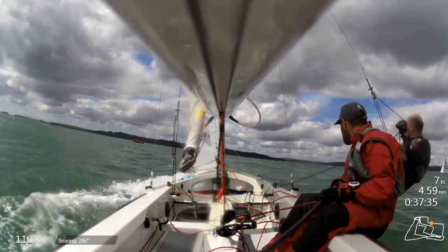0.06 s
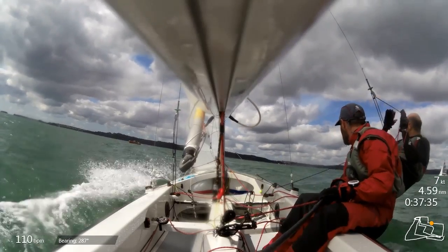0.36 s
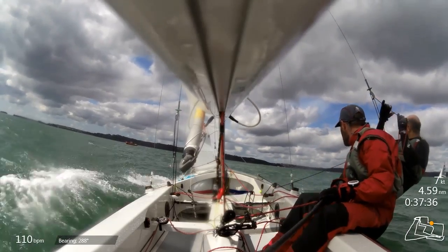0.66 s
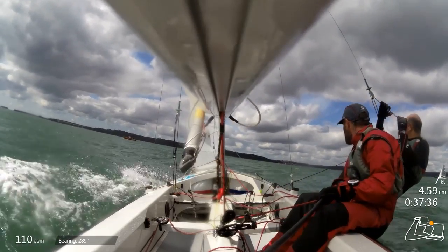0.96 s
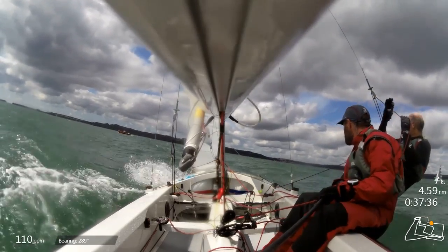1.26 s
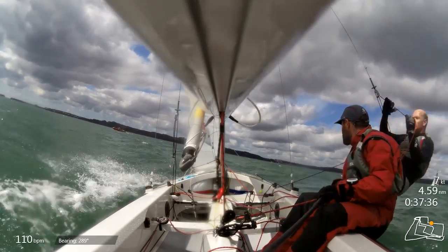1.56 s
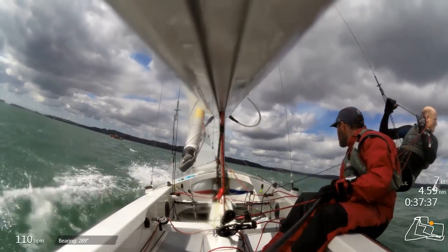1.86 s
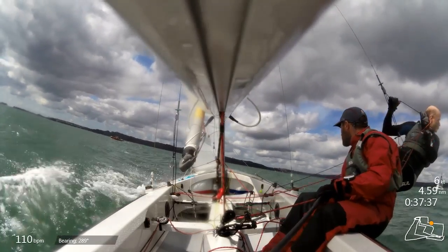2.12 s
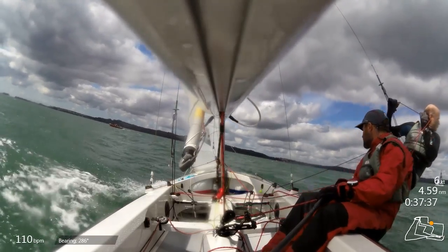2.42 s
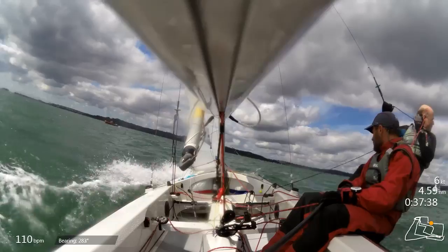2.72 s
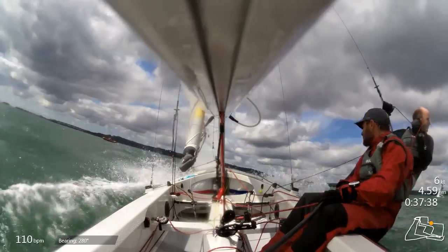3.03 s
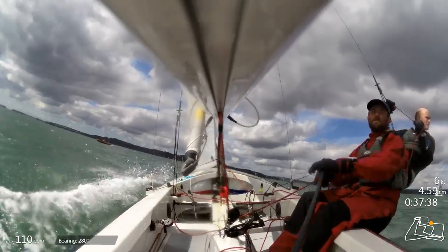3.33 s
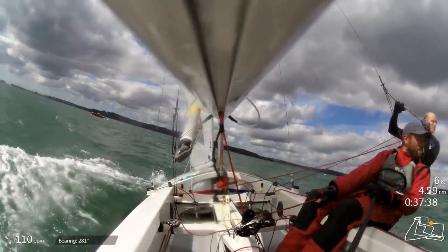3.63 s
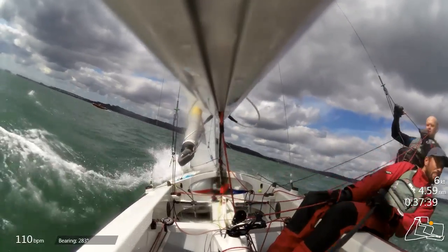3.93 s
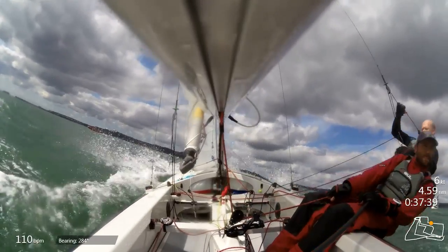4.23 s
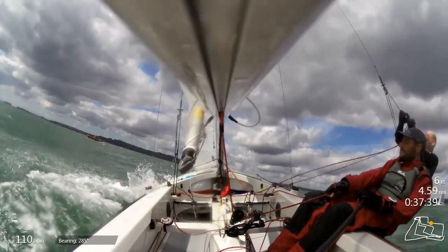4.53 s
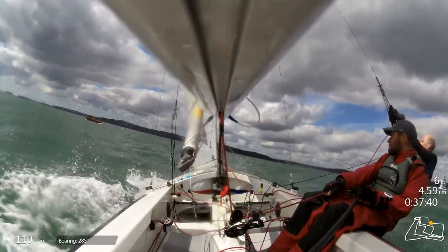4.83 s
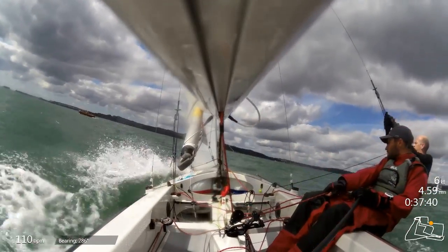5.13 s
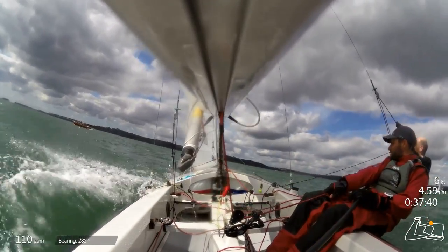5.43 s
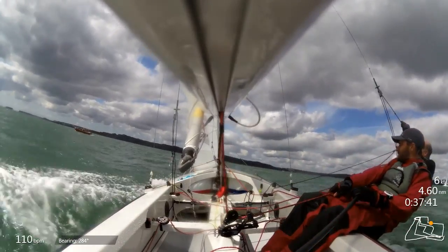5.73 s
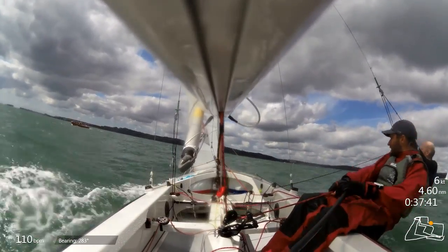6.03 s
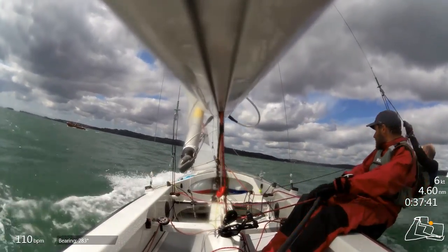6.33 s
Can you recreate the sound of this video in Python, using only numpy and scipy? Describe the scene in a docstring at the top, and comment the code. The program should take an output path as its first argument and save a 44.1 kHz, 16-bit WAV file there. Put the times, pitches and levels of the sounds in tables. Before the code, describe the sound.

A hollow, muffled wind roar with small irregular thumps fills a microphone sealed in a case aboard a speeding dinghy. Faint water hiss and a few light drips sit underneath. Midway, a stronger gust briefly distorts the sound and brings a gurgling slap of water, followed by a cluster of sharp drop taps. The buffeting continues, and a brief patter of spray lands shortly before the end.

```python
"""A dinghy in choppy water

Heard from inside a waterproof camera case at the stern of a speeding dinghy. Swirls of wind (eddies)
make the case boom near 330 Hz and overload the microphone in the hardest gusts. The bow wave hisses
dully through the case wall while spray and single drops patter on it. Midway, a hard gust drives
a wave against the case."""
import sys
import numpy as np
from scipy import signal
from scipy.fft import rfft, irfft, next_fast_len
from scipy.io import wavfile
from scipy.ndimage import uniform_filter1d

SR = 44100
rng = np.random.default_rng(int(sys.argv[2]) if len(sys.argv) > 2 else 0)


def pcm_store(signal):
    """Save signal as 16-bit PCM."""
    levels = np.round(np.clip(np.atleast_2d(signal), -1, 1) * 32767)
    wavfile.write(sys.argv[1], SR, levels.astype(np.int16).T)


N = 285327
TIME = np.arange(N) / SR
GUST_ONSET_DB = -16   # wind stronger than this counts as the hard gust
CLUMPS_HZ = 40   # how fast splashing water rises and falls as it lands in clumps

# How strong the wind is. Each row: time in seconds, relative boom level in dB.
WIND_STRENGTH = [(0, -18.5), (.72, -18), (.92, -20), (1.08, -17.5), (2.4, -19), (3.0, -16.5), (3.37, -19),
                 (3.44, -13), (3.66, -13), (3.72, -26), (3.78, -13), (3.89, -22), (3.97, -17.5),
                 (4.2, -20.5), (4.7, -18.5), (5.35, -18), (5.95, -19.5), (6.47, -18)]
# The tone of the wind inside the case. Each row: frequency in Hz, relative level in dB.
BOOM_TONE = [(150, -25.5), (208, -9.5), (245, -7.5), (295, -3), (340, 0.5), (395, -2.5), (445, -10),
             (480, -8), (545, -19.5), (700, -32), (1000, -53)]
# The hollow notes of the case. Each row: pitch in Hz, width in Hz, relative level in dB.
HOLLOW_NOTES = [(300, 25, -1), (322, 12, -5), (388.9, 28, -11.5)]
# How much those notes colour the boom. Each row: time in seconds, relative level in dB.
HOLLOW_LEVEL = [(0, -5), (1.5, -16), (3.2, -10), (3.7, -1), (5.2, -3.5), (5.9, -9), (6.47, -2)]
# The tone of small eddies at the case's edges. Each row: frequency in Hz, relative level in dB.
SMALL_EDDY_TONE = [(350, -18), (600, 5.5), (750, 1), (1000, -15.5), (1400, -21), (2200, -24), (4000, -38.5),
                   (8000, -61.5)]
# Their loudness in ordinary wind. Each row: time in seconds, relative level in dB.
SMALL_EDDY_LEVEL = [(0.0, -43), (0.79, -39.5), (0.88, -41.5), (1.62, -38.5), (1.96, -43.5), (2.72, -39),
                    (2.88, -34), (3.35, -38.5), (3.48, -31.5), (3.58, -47), (3.86, -49), (3.98, -35.5),
                    (4.14, -42), (4.59, -41), (4.96, -48), (5.75, -37), (6.04, -43), (6.47, -40)]


def wind(boom_db, fine_db, lump_db, flutter_db):
    """Lumpy air makes the case boom and its edges rush; a hard gust evens the boom and lifts the rush."""
    strength = curve(WIND_STRENGTH)
    gust = gustiness()
    eddies = np.minimum(drift(hz=21), 1.7)
    sway_db = 1.68 * drift(hz=8.2) * (1 - gust)
    hollow = from_db(curve(HOLLOW_LEVEL)) * rms_one(resonate(noise(BOOM_TONE), HOLLOW_NOTES))
    boom = steady(noise(BOOM_TONE) * from_db(lump_db * eddies) + hollow, span_s=.07)
    held_boom = from_db(1) * steady(boom, span_s=0.0095)
    boom = (1 - gust) * boom + gust * held_boom
    rush = steady(noise(SMALL_EDDY_TONE) * from_db(flutter_db * eddies), span_s=0.36)
    gust_lift_db = 4.1 * np.maximum(strength - GUST_ONSET_DB, 0)   # the gust breaks into small eddies
    rush_db = curve(SMALL_EDDY_LEVEL) + gust_lift_db + fine_db
    return from_db(sway_db) * (from_db(strength + boom_db) * boom + from_db(rush_db) * rush)


def gustiness():
    """How hard the gust blows: 0 in ordinary wind, 1 at its height."""
    strength = curve(WIND_STRENGTH)
    return np.clip((strength - GUST_ONSET_DB) / (strength.max() - GUST_ONSET_DB), 0, 1)


# Big eddies that hit the case. Each row: middle in seconds, relative peak in dB, length in seconds,
# pitch in Hz.
BIG_EDDIES = [(0.249, -7.5, 0.0085, 342.7), (.385, .5, 0.0088, 396.7), (0.559, -4.5, 0.0088, 345),
              (0.786, -6.5, .014, 340), (1.037, -1.5, 0.0034, 377), (1.181, 5.5, 0.0098, 356),
              (1.414, -8, 0.015, 307), (1.528, -5.5, 0.0068, 302), (1.772, -7, .018, 342),
              (2.075, -5.5, 0.014, 376), (2.258, -8, 0.016, 343.6), (2.465, -7.5, 0.013, 335),
              (2.707, -4.5, 0.0076, 329), (2.743, -4, 0.0052, 326.6), (2.927, -8.5, 0.015, 320),
              (3.034, -10, 0.021, 442.4), (3.294, 3.5, 0.014, 309.4), (3.321, -2, 0.012, 318),
              (3.407, -3, 0.02, 408), (3.453, 3.5, 0.0037, 366.4), (3.497, -3.5, 0.01, 308),
              (3.556, 2, 0.0077, 302), (3.586, -3, 0.014, 295), (3.641, 4, 0.0059, 344),
              (3.784, -4, 0.0084, 348), (4.587, -6, 0.0073, 355.8), (4.814, -4.5, 0.015, 320.8),
              (4.868, -9, 0.033, 322), (4.971, -9.5, 0.026, 312.7), (5.103, -7, .019, 328),
              (6.128, -6.5, 0.023, 309), (6.451, 0, 0.0089, 300)]


def buffet(flow, wander, rough, thump_db):
    """Each big eddy stirs the flow, thumps the air in the case for a few cycles and trails a calm."""
    gust = gustiness()
    stir_db = sum(0.99 * max(db + 4.5, 0) * swell(s + 0.0052, length_s=0.041) for s, db, *_ in BIG_EDDIES)
    calm_db = -1.5 * np.max([swell(s + 0.059, length_s=0.046) for s, *_ in BIG_EDDIES], axis=0)
    flow = flow * from_db((stir_db + calm_db) * (1.5 - gust))
    ceiling = from_db(-5.5 + 2 * gust)   # ordinary eddies level off here
    flow = flow / (1 + (envelope(flow) / ceiling) ** 6) ** (1 / 6)
    uneven_time = np.cumsum(1 + wander * drift(hz=90)) / SR
    uneven_force = 1 + rough * drift(hz=220)
    for s, db, length_s, hz in BIG_EDDIES:
        bell = swell(s, length_s)
        thump = from_db(db + thump_db) * uneven_force * np.sin(2 * np.pi * hz * uneven_time)
        flow = flow * (1 - .85 * bell) + bell * thump   # the thump briefly takes over
    return flow


def overload_crackle(air, onset, gust_push, crackle_db):
    """The overloaded microphone crackles on the boom's loudest swings, more readily in the hard gust."""
    grit = noise([(550, -3), (900, 2), (1400, 0), (1900, 1.5), (2600, -12.5), (4000, -26), (7000, -55)])
    excess = np.clip(envelope(air) - onset + gust_push * gustiness() ** 2, 0, .25)
    return from_db(crackle_db) * excess * np.abs(air) * grit


# Waves thrown up by the bow. Each row: middle in seconds, relative level in dB, length in seconds.
WAVES = [(0.144, -55, 0.11), (0.553, -57, 0.42), (1.009, -48, 0.25), (1.33, -57, 0.1), (1.677, -56.5, 0.7),
         (2.33, -56.5, 0.28), (2.65, -55.5, 0.099), (3.5, -41.5, 0.19), (3.799, -37.5, 0.042),
         (4.002, -41.5, 0.27), (4.51, -48, 0.45), (5.077, -46, 0.07), (5.329, -54.5, 0.57),
         (5.663, -43.5, 0.16), (5.744, -32.5, 0.1), (6.3, -64, .16)]
# The tone of the sea through the case wall. Each row: frequency in Hz, relative level in dB.
SEA_TONE = [(600, -10), (1150, 0.5), (1400, -13), (1650, -2.5), (2000, -2), (2350, -9), (2900, -0.5),
            (3280, -0.5), (3600, -9.5), (4300, -9.5), (5000, -20), (5600, -25.5), (6300, -33), (12000, -51)]
# Heavy, bubbly water slapping the case. Each row: pitch in Hz, width in Hz, relative level in dB.
SLOSH_NOTES = [(700, 160, -4), (935, 150, 1.5), (1290, 210, -4), (1480, 110, -4.5), (1960, 240, -8.5)]


def bow_wave(foam_db, hiss_db, patter_db, slosh_db, surge_db, clump_db, reach_db):
    """Foam hisses along the hull with each wave; water thrown higher patters and sloshes on the case."""
    wave_power = sum((from_db(db) * swell(s, length_s)) ** 2 for s, db, length_s in WAVES)
    level_db = 10 * np.log10(from_db(foam_db) ** 2 + wave_power)
    landing = 1 / (1 + from_db(5.3 * (reach_db - level_db)))   # share of the sound made by droplets
    hiss = from_db(hiss_db) * noise(SEA_TONE) * from_db(surge_db * drift(hz=11))
    taps = case_wall(droplets(per_s=850, spread_db=4.5), damp_hz=3800)
    patter = from_db(patter_db) * steady(taps, span_s=0.19)
    slaps = low_pass(resonate(droplets(per_s=1400, spread_db=4), SLOSH_NOTES), hz=2600, order=4)
    slosh = from_db(slosh_db) * landing * steady(slaps, span_s=0.09)
    spray = from_db(clump_db * drift(CLUMPS_HZ)) * (patter + slosh)
    return from_db(level_db) * (np.sqrt(1 - landing) * hiss + np.sqrt(landing) * spray)


# Drops landing on the case. Each row: start in seconds, relative peak in dB, treble cutoff in Hz.
DROPS = [(.378, -32, 6370), (0.548, -37, 4940), (1.038, -29.5, 1500), (1.176, -33, 7050),
         (1.343, -25.5, 3200), (2.702, -34, 4000), (2.913, -34.5, 5000), (3.107, -36.5, 3530),
         (3.282, -14.5, 4100), (3.417, -20, 4970), (3.447, -25, 4000), (3.55, -27.5, 4050),
         (3.797, -18.5, 3000), (3.8381, -9.5, 5200), (3.927, -25, 3000), (3.951, -15.5, 3000),
         (3.992, -21.5, 3000), (4.01, -19, 3200), (4.086, -20.5, 3250), (4.116, -22.5, 3000),
         (4.2006, -15, 5000), (4.471, -27, 2070), (4.499, -14.5, 5340), (4.806, -18, 5400),
         (5.22, -18.5, 4740), (5.746, -30, 3800), (5.775, -15, 3740), (5.837, -29.5, 4020),
         (6.106, -33.5, 2000), (6.373, -35.5, 2990)]


def single_drops(splat_s, trickle_s, trickle_db, impact_db, crack_db, drop_db):
    """A drop strikes the wall and bursts in a few milliseconds; its fragments follow more softly."""
    out, age = np.zeros(N + SR), TIME[:SR // 10]
    for s, db, bright_hz in DROPS:
        burst, fragments = rng.standard_normal((2, len(age)))
        hardness = from_db(.5 * (db + 18.5))   # weak hits are mostly trickle, strong ones mostly splat
        splat = hardness * (burst * np.exp(-age / splat_s) + from_db(impact_db) * (age == 0))
        trickle = from_db(trickle_db) * fragments * np.exp(-age / trickle_s)
        crack = from_db(crack_db) * low_pass(splat, bright_hz, order=3)
        tick = case_wall(splat + trickle, bright_hz) + crack
        start = int(s * SR)
        out[start:start + len(age)] += from_db(db + drop_db) * tick / np.abs(tick).max()
    return out[:N]


# The notes the case wall rings at. Each row: pitch in Hz, width in Hz, relative level in dB.
WALL_NOTES = [(647, 27, 9.5), (786, 62, 6), (1125, 28, -5), (1490, 150, -7), (1773, 37, -1.5),
              (2020, 340, -9.5), (2675, 57, -1.5), (2926, 60, 2), (3213, 130, 0), (3872, 56, -4),
              (4280, 150, -6), (4900, 390, -17.5), (5630, 280, -16)]


def case_wall(force, damp_hz):
    """The wall rings when struck and lets little treble through."""
    return low_pass(resonate(force, WALL_NOTES), damp_hz, order=4)


# The wave breaking on the case. Each row: pitch in Hz, width in Hz, relative level in dB.
CRASH_NOTES = [(500, 110, 3.5), (1300, 290, 1.5), (1590, 360, -2), (1940, 300, -6.5)]


def breaking_wave(crash_db, clump_db):
    """The hard gust drives a wave against the case: heavy, clumped slaps that gurgle."""
    slaps = low_pass(resonate(droplets(per_s=410, spread_db=6.5), CRASH_NOTES), hz=3000, order=4)
    return from_db(crash_db + clump_db * drift(CLUMPS_HZ)) * gustiness() ** 2 * steady(slaps, span_s=.08)


# The tone of the low rumble of passing air. Each row: frequency in Hz, relative level in dB.
RUMBLE_TONE = [(42, -12), (60, -7), (90, -4), (130, 1.5), (175, 1), (220, 5), (300, -17.5)]
# How loud that rumble is. Each row: time in seconds, relative level in dB.
RUMBLE_LEVEL = [(0.0, -34), (0.45, -33.5), (1.02, -32.5), (1.24, -36), (2.03, -33.5), (2.12, -33.5),
                (2.67, -33), (2.99, -39.5), (3.44, -35), (3.71, -54), (4.05, -37), (4.83, -34), (5.04, -37),
                (5.21, -31.5), (5.78, -37.5), (6.47, -36)]


def air_rumble(rumble_db, lump_db):
    """Air streaming past the stern rumbles unevenly below the boom."""
    return from_db(curve(RUMBLE_LEVEL) + rumble_db + lump_db * drift(hz=4)) * noise(RUMBLE_TONE)


def far_chop(level_db):
    """Choppy water farther off makes a faint, even hiss."""
    return from_db(level_db) * noise(SEA_TONE)


def from_db(db):
    """Turn decibels into a number to multiply by."""
    return 10 ** (np.asarray(db) / 20)


def rms_one(x):
    """Scale a signal so its average level (rms) is 1."""
    return x / np.sqrt(np.mean(x ** 2) + 1e-20)


def steady(x, span_s):
    """Hold the level near 1 over each span, keeping the faster flutter."""
    return x / np.sqrt(uniform_filter1d(x ** 2, max(int(span_s * SR), 2)) + 1e-12)


def envelope(x):
    """The outline that follows a signal's peaks."""
    return np.abs(signal.hilbert(x))


def curve(rows):
    """Join (seconds, value) points with straight lines."""
    return np.interp(TIME, *np.transpose(rows))


def swell(middle_s, length_s):
    """A bell shape of height 1, `length_s` wide at half height."""
    return 2 ** -np.minimum((2 * (TIME - middle_s) / length_s) ** 2, 60)


def drift(hz):
    """A random wobble of size about 1, with speeds up to about `hz`."""
    return rms_one(low_pass(rng.standard_normal(N + SR), hz, order=2)[SR:])


def noise(tone):
    """Noise at level 1, shaped by (Hz, dB) points and fading steeply beyond them."""
    hz, db = np.transpose(tone)
    size = next_fast_len(N)
    f = np.arange(size // 2 + 1) * SR / size + 1
    ends = np.minimum(1, f / hz[0]) ** 2 * np.minimum(1, hz[-1] / f) ** 4
    gain = from_db(np.interp(np.log(f), np.log(hz), db)) * ends
    return rms_one(irfft(rfft(rng.standard_normal(size)) * gain, size)[:N])


def droplets(per_s, spread_db):
    """Tiny hits at random moments, many small and few large."""
    sizes = from_db(spread_db * np.minimum(rng.exponential(1, N), 4)) * rng.choice([-1, 1], N)
    return rms_one(sizes * (rng.random(N) < per_s / SR))


def low_pass(x, hz, order):
    """Soften the treble above `hz`; a higher order cuts more steeply."""
    return signal.sosfilt(signal.butter(order, min(hz, .45 * SR), fs=SR, output="sos"), x)


def resonate(force, notes):
    """Ring all the notes at once, every other one upside down; narrow notes ring longer."""
    out = 0
    for k, (hz, width, db) in enumerate(notes):
        decay = np.exp(-np.pi * width / SR)
        poles = [1, -2 * decay * np.cos(2 * np.pi * hz / SR), decay ** 2]
        ring = (1 - decay ** 2) / 2 * signal.lfilter([1, 0, -1], poles, force + 1e-18)
        out = out + (-1) ** k * from_db(db) * ring
    return out


def scene():
    """Wind and water inside the case, with the microphone's crackle, in one channel."""
    flow = wind(boom_db=0.26, fine_db=-0.5, lump_db=1.86, flutter_db=5.5)
    air = buffet(flow, wander=0.06, rough=0.11, thump_db=-0.11) + air_rumble(rumble_db=3, lump_db=4.5)
    water = far_chop(level_db=-68.5)
    water += bow_wave(foam_db=-62, hiss_db=1, patter_db=1.7, slosh_db=-6,
                      surge_db=2.65, clump_db=2, reach_db=-45.5)
    water += single_drops(splat_s=0.0025, trickle_s=0.017, trickle_db=-15,
                          impact_db=5, crack_db=-34, drop_db=1)
    water += breaking_wave(crash_db=-31, clump_db=5)
    crackle = overload_crackle(air, onset=0.55, gust_push=.16, crackle_db=-9.5)
    return (air + crackle + water)[None]


def record(dry):
    """The microphone flattens the highest peaks; the deepest bass and highest treble are cut."""
    knee, room = 0.51, 0.15   # peaks above the knee are squeezed into this much room
    bass_cut_hz, treble_cut_hz = 32, 15700
    excess = np.maximum(np.abs(dry) - knee, 0)
    rounded = np.clip(dry, -knee, knee) + np.sign(dry) * room * np.tanh(excess / room)
    trimmed = signal.sosfilt(signal.butter(2, bass_cut_hz, "high", fs=SR, output="sos"), rounded)
    return signal.sosfilt(signal.cheby2(12, 70, treble_cut_hz, fs=SR, output="sos"), trimmed)


dry = scene()
out = record(dry)
pcm_store(out)
```